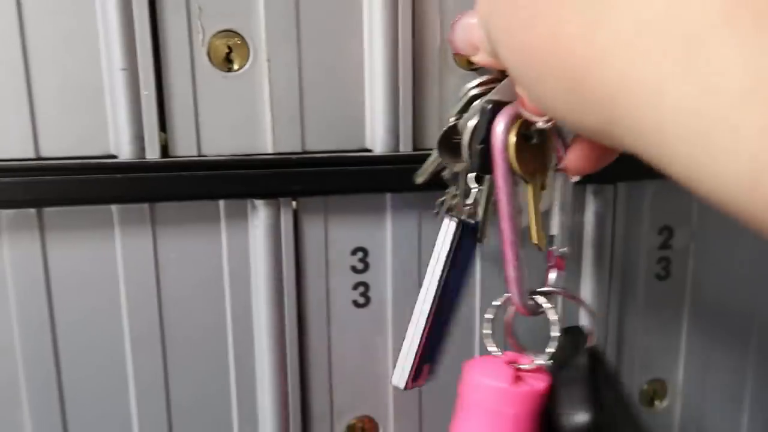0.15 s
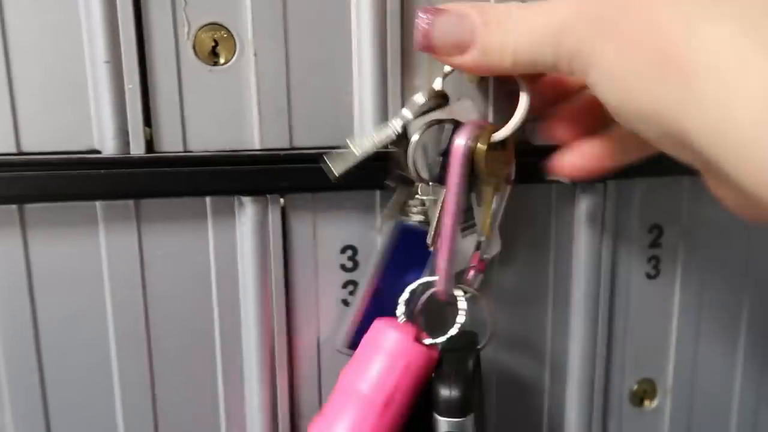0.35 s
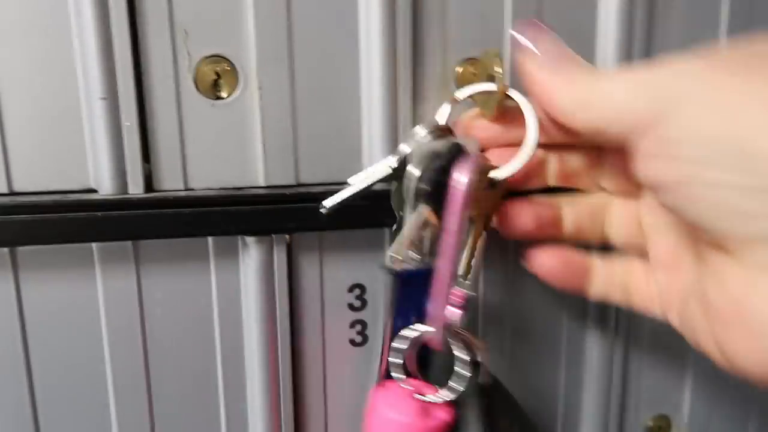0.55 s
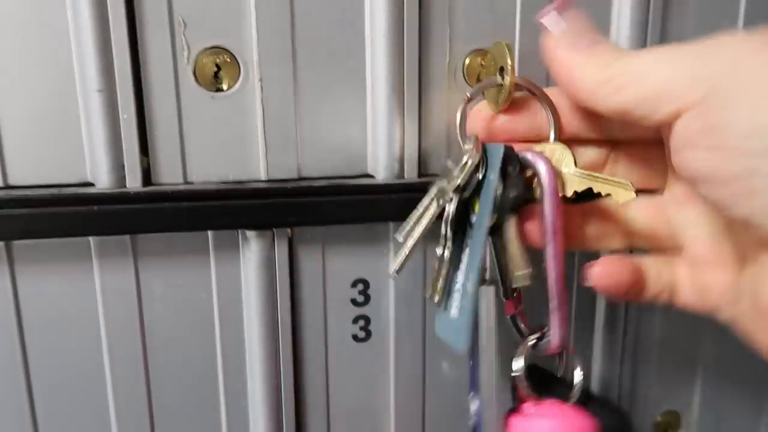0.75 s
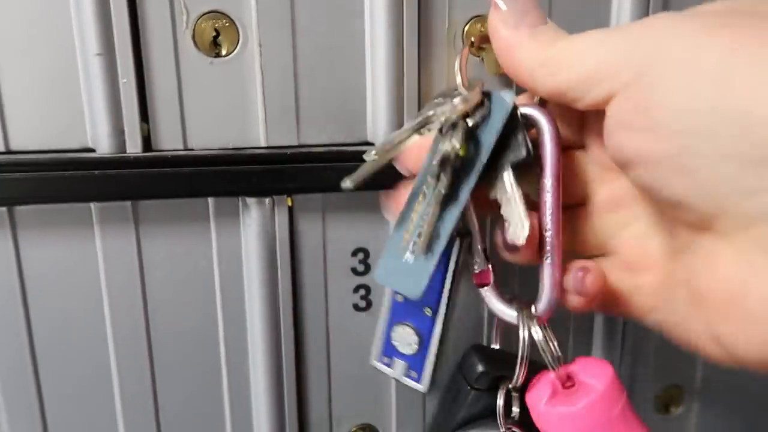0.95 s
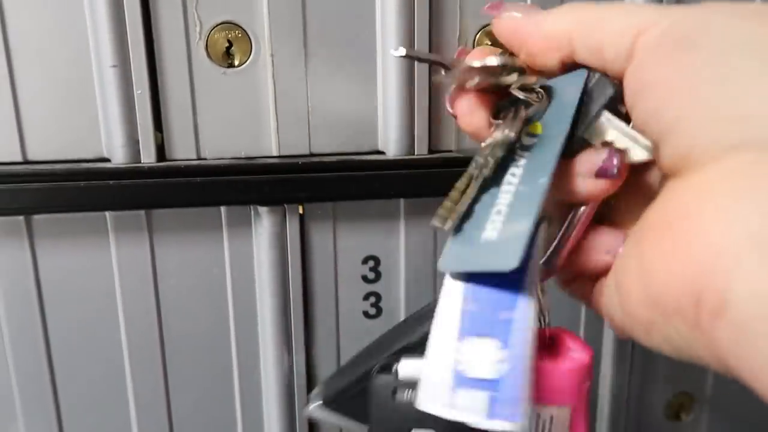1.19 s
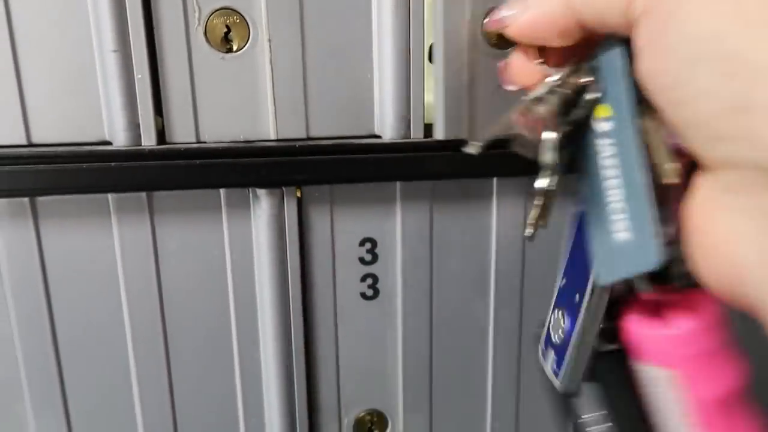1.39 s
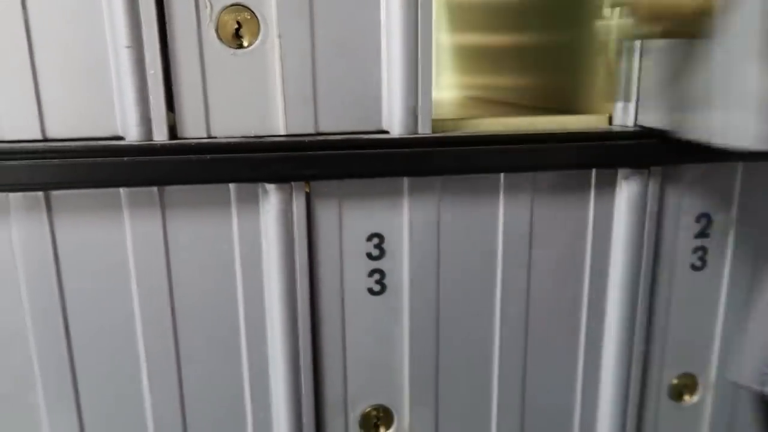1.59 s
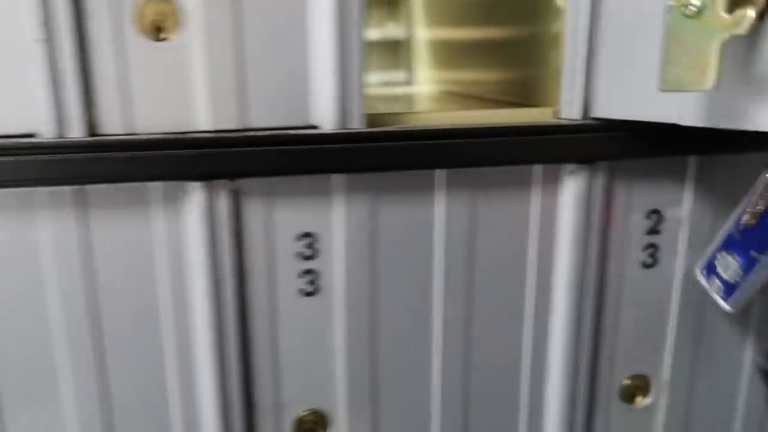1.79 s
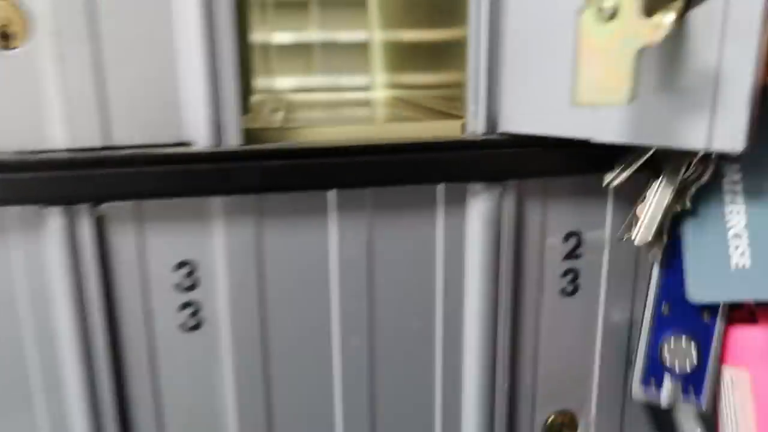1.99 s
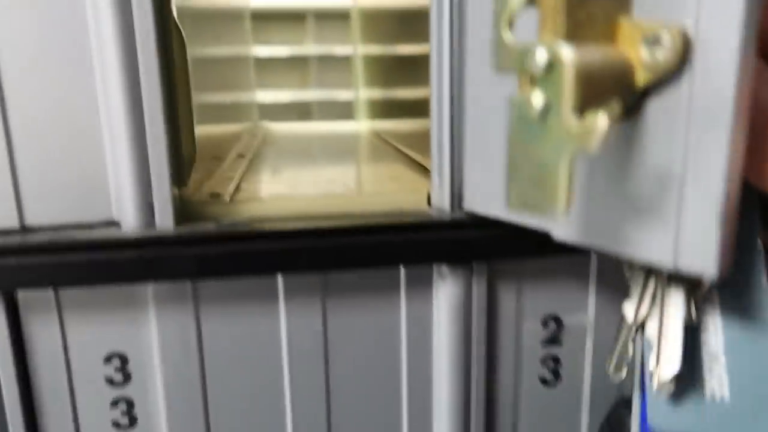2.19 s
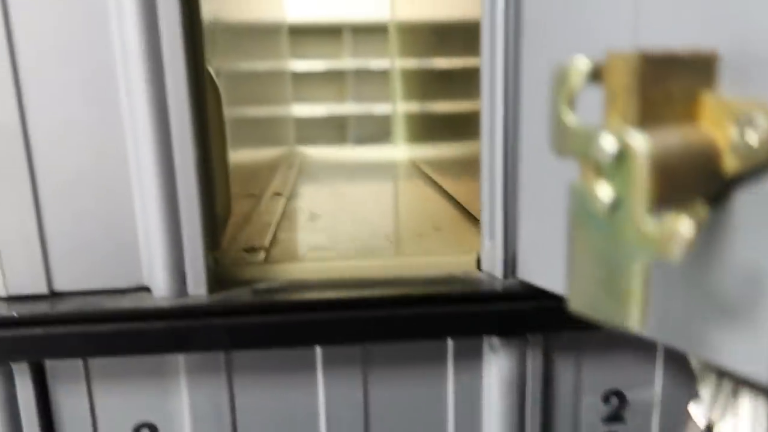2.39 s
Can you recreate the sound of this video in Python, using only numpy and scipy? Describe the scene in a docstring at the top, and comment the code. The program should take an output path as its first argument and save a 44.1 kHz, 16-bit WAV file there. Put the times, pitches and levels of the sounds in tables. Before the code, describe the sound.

A jangling bunch of keys unlocks a metal mailbox, whose door clunks open.

```python
"""A bunch of keys jangles close by, over the dull rub of a hand at a metal mailbox.
One key rasps into the lock and is turned; the lock knocks in its thin door and the panels boom.
The door swings open with hollow clunks and the hanging bunch clatters against the boxes beside it.
Each hit is a few ringing metal modes plus a crack of noise. A hard-walled room answers."""
import sys
import numpy as np
from scipy import signal
from scipy.fft import rfft, irfft, next_fast_len
from scipy.io import wavfile
from scipy.ndimage import uniform_filter1d, map_coordinates

SR = 44100
rng = np.random.default_rng(int(sys.argv[2]) if len(sys.argv) > 2 else 0)


def dump(signal):
    """Clip the signal to [-1, 1] and save it as 16-bit WAV at the path in sys.argv[1]."""
    limited = np.clip(np.atleast_2d(signal).T, -1, 1)
    pcm = np.round(limited * 32767).astype(np.int16)
    wavfile.write(sys.argv[1], SR, pcm)


N = 108045
RING_SAMPLES = 11025
KNOCK_DETUNE, KEY_DETUNE = .012, .07  # random spread of each mode, as a fraction of its pitch


def amp(db):
    """Decibels to gain."""
    return 10 ** (np.asarray(db) / 20)


def unit(x):
    """Scale to rms 1."""
    return x / np.sqrt(np.mean(x ** 2) + 1e-20)


def along(points, hz):
    """Read (f/Hz, value) breakpoints on a log frequency axis."""
    f, values = np.transpose(points)
    return np.interp(np.log(hz + 1), np.log(f + 1), values)


def curves(rows):
    """One automation lane for each column after the time, a value per sample."""
    times, *columns = np.transpose(rows)
    return [np.interp(np.arange(N) / SR, times, column) for column in columns]


def filtered(x, response):
    """Zero-phase EQ; response gives the gain at each frequency."""
    n = x.shape[-1]
    padded = next_fast_len(n + 2048)
    return irfft(rfft(x, padded) * response(np.fft.rfftfreq(padded, 1 / SR)), padded)[..., :n]


def noise(eq, size):
    """Noise coloured by an EQ curve, at rms 1."""
    return unit(filtered(rng.standard_normal(size), lambda hz: amp(along(eq, hz))))


def add(track, s, sound):
    """Mix a sound in at s seconds."""
    i = int(np.clip(round(s * SR), 0, N - 1))
    track[i:i + len(sound)] += sound[:N - i]


def strike(modes, eq, crack_t60, crack_db, detune, vary_db=3.5):
    """One hit: ringing modes plus a noise crack for the dense, fast-dying ones."""
    t = np.arange(RING_SAMPLES) / SR
    hz, db, t60 = np.transpose(modes)[:, :, None]
    level, pitch, polarity = rng.standard_normal((3, len(modes), 1))
    envelopes = np.sign(polarity) * amp(db + vary_db * level - 60 * t / t60)
    ring = (envelopes * np.sin(2 * np.pi * hz * (1 + detune * pitch) * t)).sum(0)
    attack = 1 - np.exp(-t * 2 * hz.max())
    crack = noise(eq, RING_SAMPLES) * amp(-60 * t / crack_t60) * attack
    hit = unit(unit(ring) + amp(crack_db) * unit(crack))
    return hit * np.sqrt(.005 * SR / RING_SAMPLES)  # the energy of 5 ms at rms 1


def patter(modes, eq, per_second, scatter_db, crack_db, voices=6):
    """A texture of tiny random hits shared among a few metal voices, ridden to an even level."""
    out = np.zeros(N)
    for _ in range(voices):
        taps = (rng.random(N) < per_second / voices / SR) * amp(scatter_db * rng.standard_normal(N))
        voice = strike(modes, eq, crack_t60=.027, crack_db=crack_db, detune=KEY_DETUNE)
        out += signal.fftconvolve(taps, voice)[:N]
    out = unit(out)
    local_power = np.abs(uniform_filter1d(out ** 2, size=1800))
    return out / np.sqrt(local_power + .01)


# Metallic mids of the lock with its key, bright top of the small keys: f/Hz, level/dB, t60/s
LOCK_MODES = [(1768, -2.5, 0.019), (2196, 1.5, 0.014), (2719, -4, 0.04), (3543, 0, 0.025),
              (4165, -4.5, 0.0082), (4530, -14.5, 0.036), (5597, -3.5, 0.019)]
KEY_MODES = [(7860, -16, 0.049), (8550, -1.5, 0.043), (10630, -4.5, 0.05), (11820, -4.5, 0.039),
             (13600, -13.5, 0.04)]
# Tone of the crack on each: f/Hz, level/dB
LOCK_EQ = [(600, -17.5), (1400, -4.5), (3400, -1), (5500, -7), (6800, -12), (11000, -30)]
KEY_EQ = [(3500, -47.5), (6500, 3.5), (8000, 4), (11500, -2.5), (15500, -7.5)]
# Swells of the loose bunch: t/s, mids/dB, treble/dB
JINGLE_FADERS = [(.15, -58, -70), (.21, -46, -52), (.3, -56, -68), (.41, -33, -44), (.46, -29, -36),
                 (.53, -33, -41), (.76, -42, -56), (.82, -33, -40), (.9, -48, -62), (.96, -36, -42),
                 (1.18, -47, -55), (1.33, -31, -44), (1.39, -43, -58), (1.46, -36, -51), (1.66, -54, -72),
                 (1.78, -36, -49), (1.85, -35, -44), (1.93, -52, -68), (2.04, -33, -48), (2.14, -70, -90)]


def jingle():
    """The bunch rattles as the hand moves it: small clinks from keys of many pitches."""
    mids_db, treble_db = curves(JINGLE_FADERS)
    mids = patter(LOCK_MODES, LOCK_EQ, per_second=260, scatter_db=5, crack_db=-7, voices=14)
    treble = patter(KEY_MODES, KEY_EQ, per_second=170, scatter_db=5, crack_db=-4, voices=14)
    return amp(mids_db) * mids + amp(treble_db) * treble


# Rub of key and door, and low rumble of the moving hand: t/s, level/dB
SCRAPE_FADER = [(.15, -48.5), (.33, -39), (.41, -34), (.55, -36), (.92, -42.5), (1.6, -44), (1.9, -48),
                (2.06, -35.5), (2.25, -57.5)]
RUMBLE_FADER = [(0, -54), (.4, -40.5), (1.6, -61.5)]
# Their dark tone: f/Hz, level/dB
SCRAPE_EQ = [(80, -21), (185, 2.5), (280, 1), (420, -3), (720, -7.5), (2000, -15.5), (9000, -71)]
RUMBLE_EQ = [(35, -5), (100, -4.5), (300, -48)]


def scrape():
    """Dull rubbing carried by the sheet metal, over the rumble of the hand."""
    scrape_db, = curves(SCRAPE_FADER)
    rumble_db, = curves(RUMBLE_FADER)
    return amp(scrape_db) * noise(SCRAPE_EQ, N) + amp(rumble_db) * noise(RUMBLE_EQ, N)


# Boxy body of the thin door: f/Hz, level/dB, t60/s
DOOR_MODES = [(475, -9.5, 0.046), (677.4, 3.5, 0.024), (744, -2, 0.035), (941, -4, 0.026),
              (1083, -2.5, 0.018)]
# Tone of its crack: f/Hz, level/dB
DOOR_EQ = [(200, -12.5), (450, -3), (700, 6), (1100, -13), (1500, 1), (3000, -45)]
# Keys, rings and tags hitting each other: t/s, clack/dB, bright edge/dB
CLACK_CUES = [(0.0494, -25.5, -37), (0.1769, -44, -37), (0.4544, -18, -17.5), (0.4652, -14.5, -21.5),
              (0.4849, -28, -45), (0.548, -26.5, -41), (0.6318, -17.5, -33.5), (0.7877, -30.5, -30),
              (0.8368, -28, -39), (0.9571, -27, -32), (1.0795, -36, -56), (1.1377, -29.5, -33),
              (1.2551, -31.5, -38), (1.2923, -24, -41), (1.4002, -28, -48), (1.4158, -35.5, -51),
              (1.7695, -23, -40), (1.7732, -19.5, -32.5), (1.8112, -24.5, -34.5), (1.84, -33.5, -27),
              (1.8687, -23.5, -36), (1.9928, -22, -25.5), (2.0069, -20, -24.5), (2.0287, -23.5, -47.5),
              (2.3017, -45, -50), (2.4293, -29.5, -53)]


def clacks():
    """Light hits within the bunch, each tuned a little differently, with door body tucked under."""
    out = np.zeros(N)
    for s, clack_db, edge_db in CLACK_CUES:
        body = strike(DOOR_MODES, DOOR_EQ, crack_t60=.11, crack_db=-2, detune=KEY_DETUNE)
        clack = strike(LOCK_MODES, LOCK_EQ, crack_t60=.013, crack_db=6, detune=KEY_DETUNE)
        edge = strike(KEY_MODES, KEY_EQ, crack_t60=.014, crack_db=-.5, detune=KEY_DETUNE)
        add(out, s, amp(clack_db - 10) * body + amp(clack_db) * clack + amp(edge_db) * edge)
    return out


# A key left free to ring after a hit: t/s, f/Hz, level/dB
CLINK_CUES = [(.177, 11800, -41), (.595, 1777, -9), (.633, 13500, -31), (.941, 11750, -29),
              (0.996, 5870, -22.5), (1.0952, 3353, -17), (1.3288, 2930, -22), (1.429, 2705, -15),
              (1.5015, 2720, -15.5), (2.0122, 6025, -8.5), (2.4305, 3354, -23)]
# Its partials: multiple of f, level/dB, t60/s for a key at middle_hz
CLINK_PARTIALS = [(1.001, 4.5, 0.025), (1.3, -0.5, .022), (1.7, -4.5, .022)]


def clinks(middle_hz=3000, overtone_limit_hz=6800):
    """Single keys ping briefly; higher keys last longer, and the highest overtones barely speak."""
    out, t = np.zeros(N), np.arange(RING_SAMPLES) / SR
    multiple, partial_db, middle_t60 = np.transpose(CLINK_PARTIALS)[:, :, None]
    for s, pitch, db in CLINK_CUES:
        hz = pitch * multiple
        t60 = middle_t60 * (pitch / middle_hz) ** .75
        tones = np.sin(2 * np.pi * (hz * t + rng.random(hz.shape)))
        envelopes = amp(db + partial_db - 60 * t / t60)
        rolloff = 1 / (1 + (multiple > 1) * (hz / overtone_limit_hz) ** 20)
        attack = 1 - np.exp(-t * pitch)
        add(out, s, (rolloff * envelopes * tones).sum(0) * attack)
    return out


# Low boom of the box panels: f/Hz, level/dB, t60/s
PANEL_MODES = [(179, 0.5, 0.32), (270, 6.5, 0.13), (472, -5, 0.074)]
# Tone of their thud: f/Hz, level/dB
PANEL_EQ = [(50, -44), (170, 5.5), (400, -1.5), (600, -25), (1500, -56)]
# Blows on lock and door: t/s, panel boom/dB, door knock/dB, clack/dB, bright edge/dB
KNOCK_CUES = [(0.1967, -23.5, -21, -21.5, -31.5), (0.3728, -22.5, -20.5, -17, -37),
              (0.3956, -17, -17.5, -22, -46), (0.4121, -33, -31, -15, -29),
              (0.5239, -33, -15.5, -20.5, -39), (0.581, -30.5, -18.5, -28, -60),
              (0.5938, -16.5, -14.5, -22, -33), (0.7123, -18.5, -23.5, -30.5, -59),
              (0.7449, -29, -20, -34, -60), (0.7528, -24, -36, -39, -55), (0.8045, -29, -18, -19.5, -26),
              (0.8579, -18, -23, -26.5, -55), (0.8719, -24.5, -24.5, -41, -64),
              (0.9954, -27, -21.5, -20.5, -27), (1.095, -27, -14, -19, -30), (1.2304, -48, -25, -31, -46),
              (1.4287, -35.5, -23.5, -19.5, -39), (1.4435, -59, -20, -16.5, -43),
              (1.4803, -56, -26, -48, -43), (1.5013, -30.5, -28, -25, -36),
              (1.6792, -25, -23.5, -22, -27.5), (1.965, -34, -23, -19.5, -45),
              (2.0120, -23.5, -17, -8, -25), (2.0404, -36.5, -19.5, -15.5, -36)]


def knocks():
    """The lock and the heavy bunch hit the door, which passes the blow to the panels."""
    out = np.zeros(N)
    for s, boom_db, knock_db, clack_db, edge_db in KNOCK_CUES:
        boom = strike(PANEL_MODES, PANEL_EQ, crack_t60=.044, crack_db=.5, detune=KNOCK_DETUNE)
        knock = strike(DOOR_MODES, DOOR_EQ, crack_t60=.032, crack_db=-5.5, detune=KNOCK_DETUNE)
        clack = strike(LOCK_MODES, LOCK_EQ, crack_t60=.033, crack_db=3.5, detune=KNOCK_DETUNE)
        edge = strike(KEY_MODES, KEY_EQ, crack_t60=.024, crack_db=2, detune=KNOCK_DETUNE)
        add(out, s, amp(boom_db) * boom + amp(knock_db) * knock
            + amp(clack_db) * clack + amp(edge_db) * edge)
    return out


def rasp(peak_s=.469, half_width_s=.052, level_db=-24.5):
    """The teeth of the key grind past the pins in one gritty stroke."""
    stroke = np.exp(-((np.arange(N) / SR - peak_s) / half_width_s) ** 2)
    grit = patter(LOCK_MODES, LOCK_EQ, per_second=5000, scatter_db=2, crack_db=2)
    sizzle = amp(-4.5) * noise(KEY_EQ, N)
    return amp(level_db) * stroke * (grit + sizzle)


# The door swinging free: t/s, f/Hz, level/dB
CLUNK_CUES = [(1.683, 704, -17.5), (2.0408, 495, -9), (2.0405, 939, -11)]


def clunks(t60=.042, blur_hz=60):
    """The loose door gives short hollow notes, blurred by its rattling hinge."""
    out, t = np.zeros(N), np.arange(RING_SAMPLES) / SR
    for s, hz, db in CLUNK_CUES:
        phase_drift = np.cumsum(rng.standard_normal(RING_SAMPLES)) * np.sqrt(2 * np.pi * blur_hz / SR)
        note = amp(db - 60 * t / t60) * np.sin(2 * np.pi * hz * t + phase_drift)
        octave = signal.butter(2, [hz / np.sqrt(2), hz * np.sqrt(2)], "bandpass", fs=SR, output="sos")
        add(out, s, signal.sosfilt(octave, note))
    return out


# Decay of the hard-walled room: f/Hz, t60/s
TAIL_DECAY = [(150, 0.39), (1000, 0.49), (6000, 0.3)]
# Tone of its tail: f/Hz, level/dB
TAIL_EQ = [(60, -6.5), (250, -1), (2500, -3.5), (15000, -8.5)]


def room(x, early_db=-7.5, early_t60=.11):
    """Early reflections off the wall of boxes, then the short tail of the room."""
    bands, frames_s, spectrum = signal.stft(rng.standard_normal(SR), SR, nperseg=256)
    decay = amp(-60 * frames_s / along(TAIL_DECAY, bands)[:, None])
    tail = signal.istft(spectrum * decay, SR, nperseg=256)[1]
    t = np.arange(len(tail)) / SR
    tail *= 1 - np.exp(-t / .0047)  # soft onset
    tail = amp(-14) * filtered(tail / np.linalg.norm(tail), lambda hz: amp(along(TAIL_EQ, hz)))
    early = rng.standard_normal(len(t)) * amp(-60 * t / early_t60) * (t > .003)  # 3 ms pre-delay
    return signal.fftconvolve(x, tail + amp(early_db) * early / np.linalg.norm(early))[:N]


# Faint, dark noise bed: f/Hz, level/dB
BED_EQ = [(20, -3.5), (350, -20.5), (3000, -25), (15000, -46.5)]
# Stereo width, greatest in the treble: f/Hz, side level/dB
WIDTH_EQ = [(200, -32), (2000, -24.5), (9000, -8.5)]
# The bunch moving right with the door: t/s, left lag/ms, left minus right/dB
PAN_PATH = [(1.45, 0.019, -0.8), (1.75, 0.026, -2), (2.05, 0.036, -1.4)]


def scene():
    """Keys and mailbox sit just right of centre; the left side lags more as the door opens."""
    low_cut = signal.butter(1, 90, "highpass", fs=SR, output="sos")
    hits = signal.sosfilt(low_cut, knocks() + clacks() + clinks() + clunks())
    near = hits + jingle() + rasp() + scrape()
    mid = near + room(near) + amp(-57.5) * noise(BED_EQ, N)
    diffuser = rng.standard_normal(2048) * np.exp(-np.arange(2048) / 350)  # an 8 ms smear
    diffuse = signal.fftconvolve(near, diffuser / np.linalg.norm(diffuser))[:N]
    side = filtered(diffuse + 2 * room(near), lambda hz: amp(along(WIDTH_EQ, hz)))
    lag_ms, balance_db = curves(PAN_PATH)
    lag_samples = lag_ms * SR / 1000
    channels = []
    for sign in (1, -1):  # left, right
        shifted = map_coordinates(mid + sign * side, [np.arange(N) - sign * lag_samples / 2], order=5)
        channels.append(amp(sign * balance_db / 2) * shifted)
    return np.array(channels)


def record(dry, ceiling=2.9, top_hz=15800):
    """A soft clip rounds the loudest peaks, then a brick-wall low-pass trims the top."""
    rounded = dry / (1 + np.abs(dry / ceiling) ** 6) ** (1 / 6)
    return filtered(rounded, lambda hz: 1 / np.sqrt(1 + (hz / top_hz) ** 300))


dry = scene()
out = record(dry)
dump(out)
```